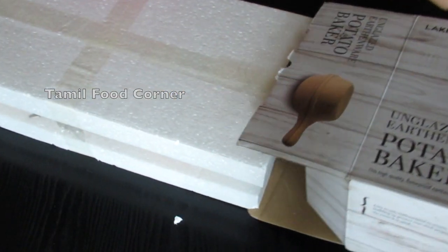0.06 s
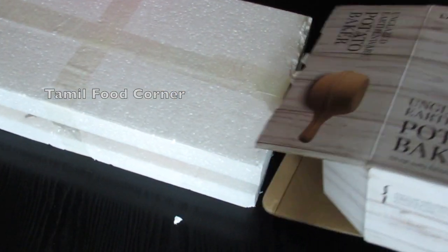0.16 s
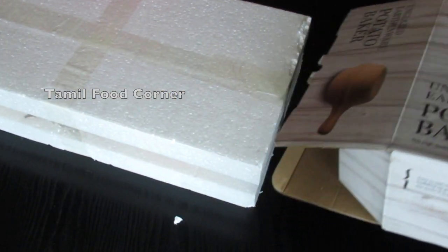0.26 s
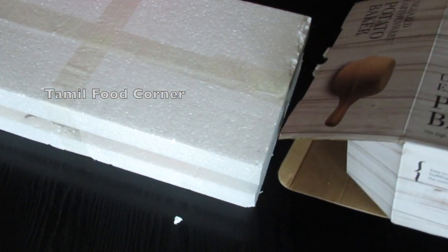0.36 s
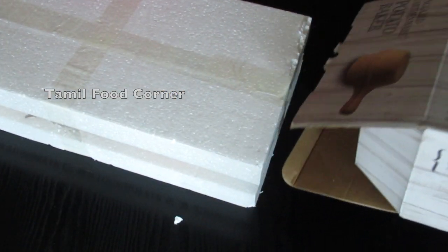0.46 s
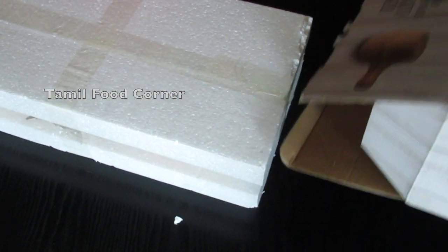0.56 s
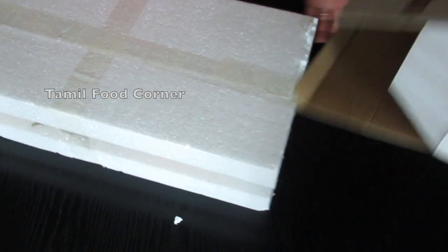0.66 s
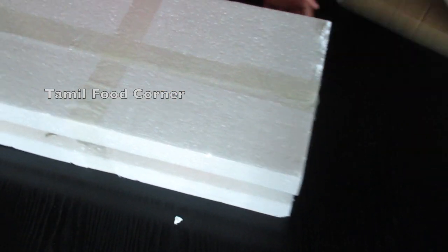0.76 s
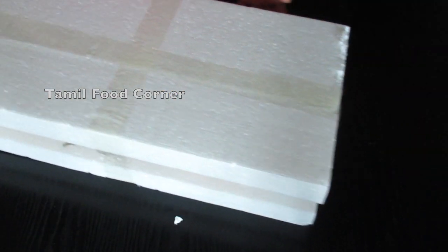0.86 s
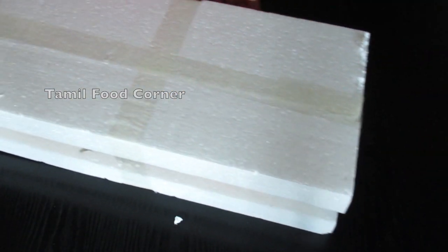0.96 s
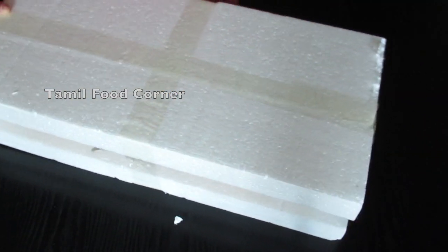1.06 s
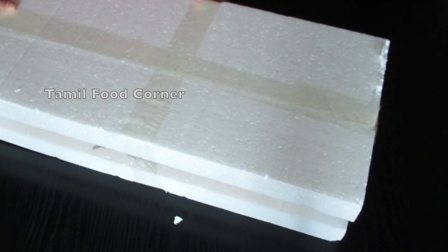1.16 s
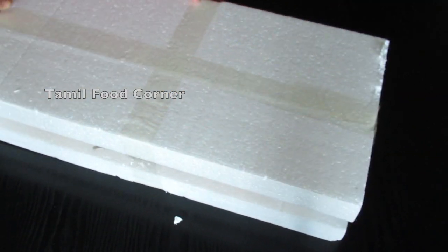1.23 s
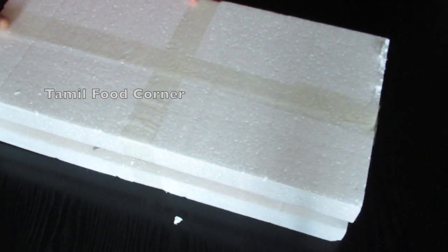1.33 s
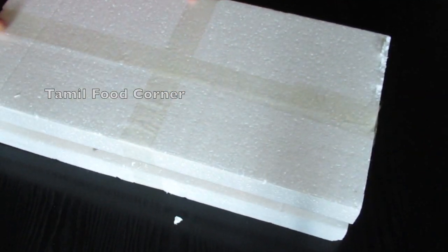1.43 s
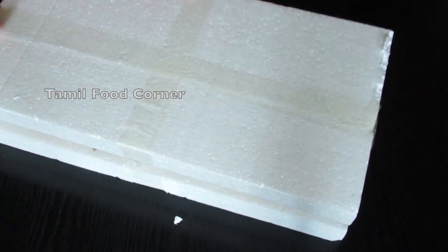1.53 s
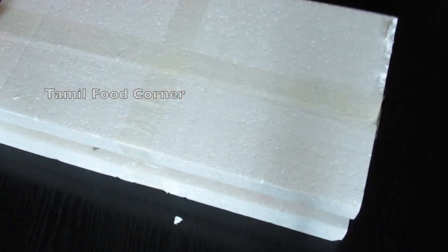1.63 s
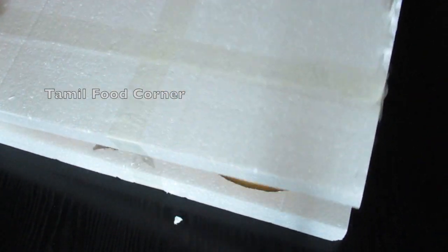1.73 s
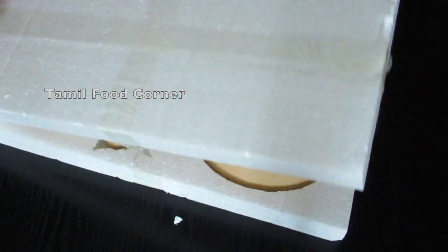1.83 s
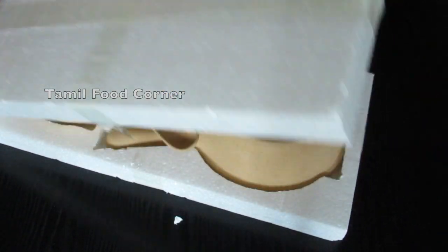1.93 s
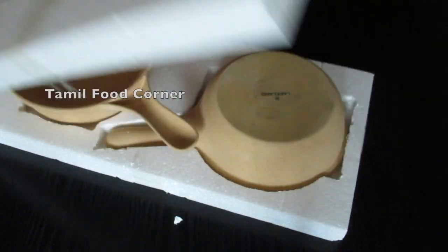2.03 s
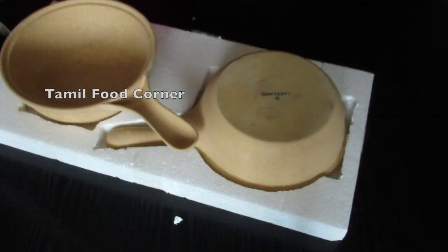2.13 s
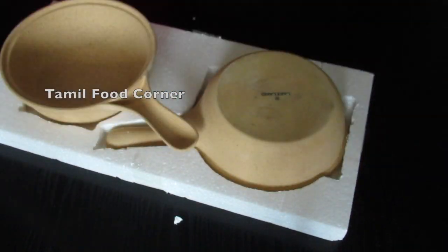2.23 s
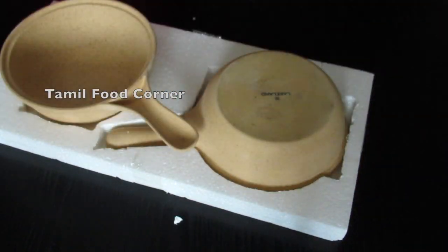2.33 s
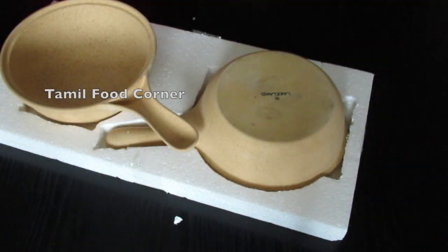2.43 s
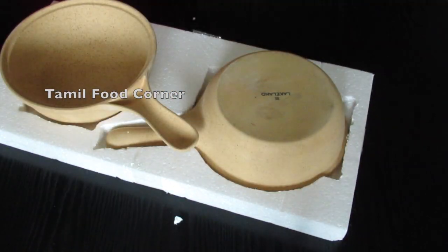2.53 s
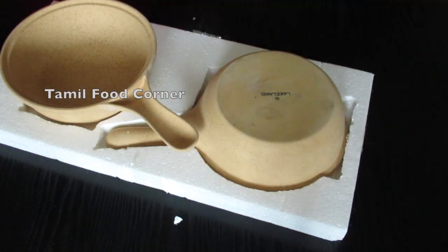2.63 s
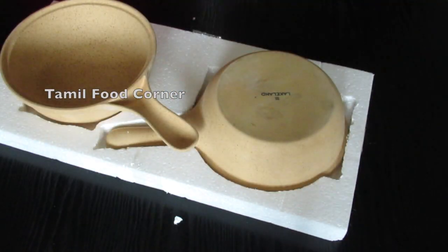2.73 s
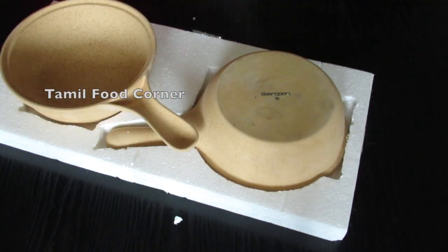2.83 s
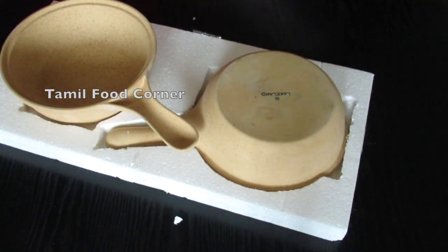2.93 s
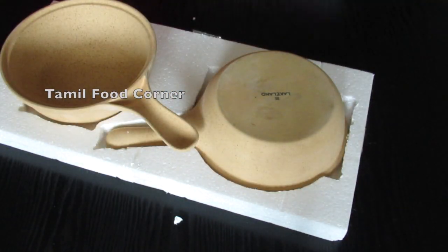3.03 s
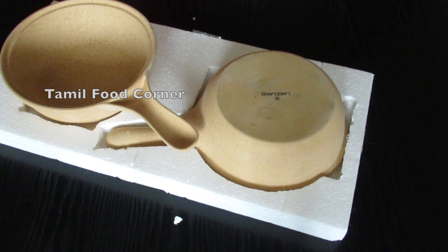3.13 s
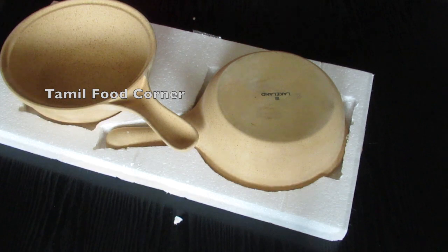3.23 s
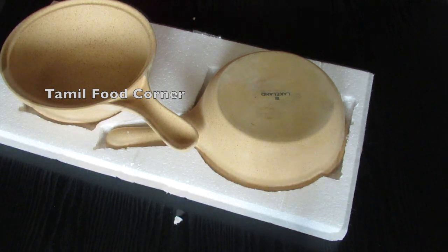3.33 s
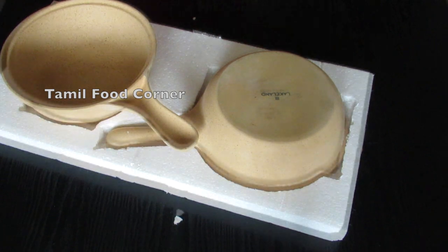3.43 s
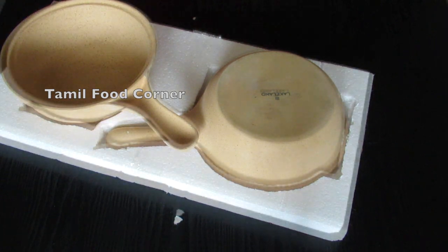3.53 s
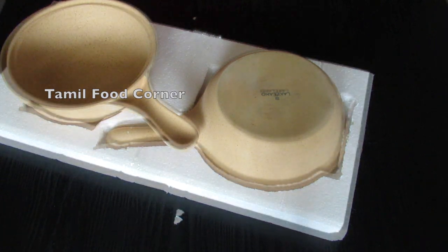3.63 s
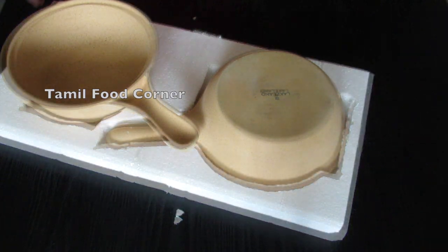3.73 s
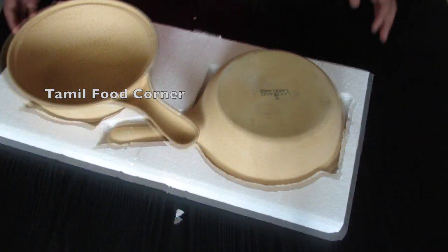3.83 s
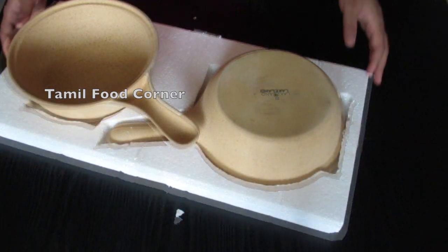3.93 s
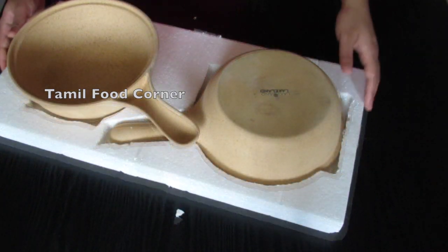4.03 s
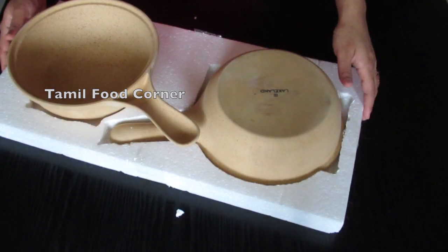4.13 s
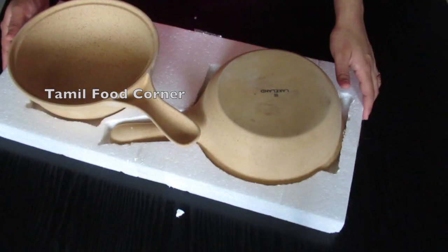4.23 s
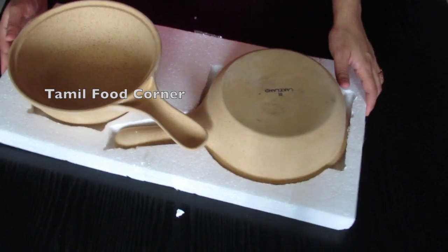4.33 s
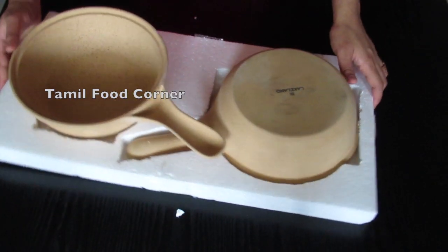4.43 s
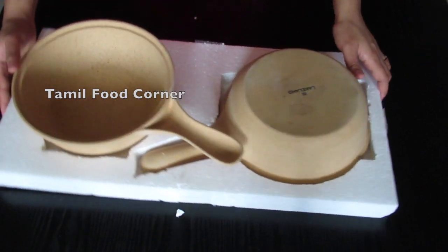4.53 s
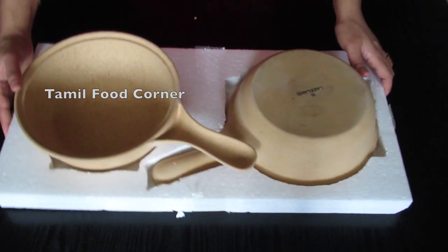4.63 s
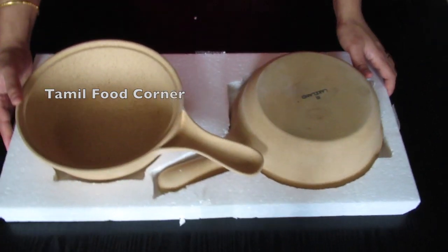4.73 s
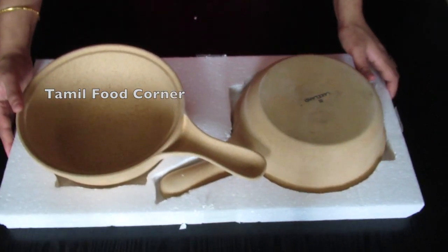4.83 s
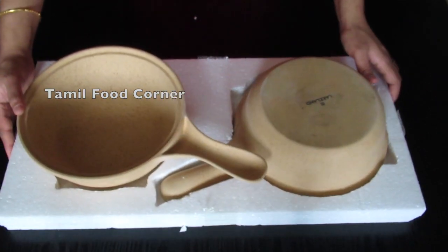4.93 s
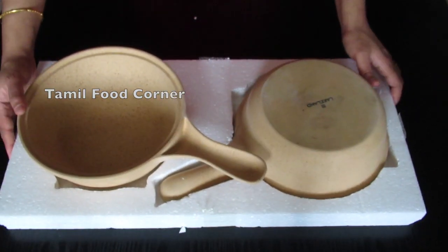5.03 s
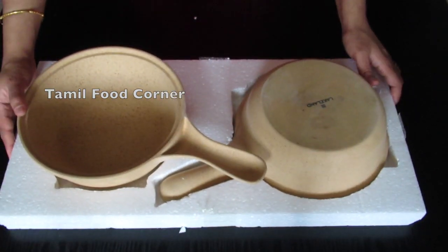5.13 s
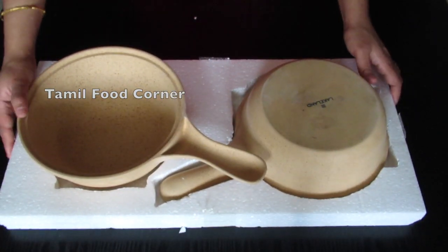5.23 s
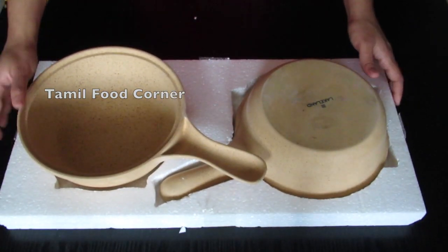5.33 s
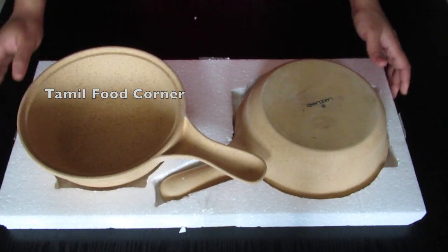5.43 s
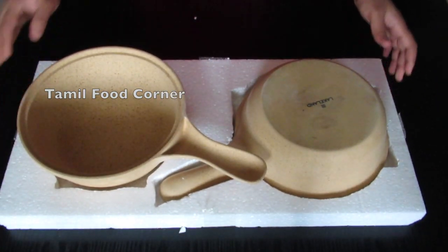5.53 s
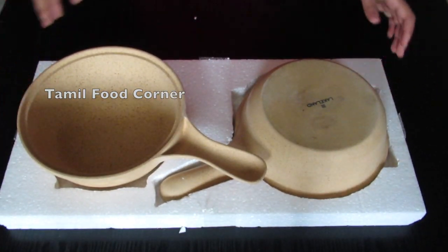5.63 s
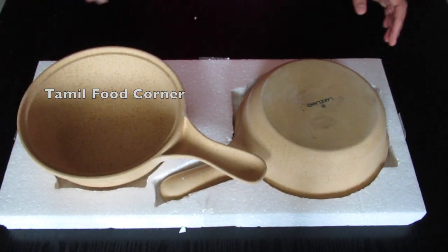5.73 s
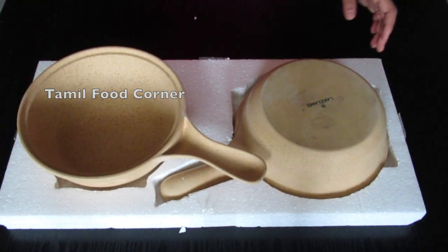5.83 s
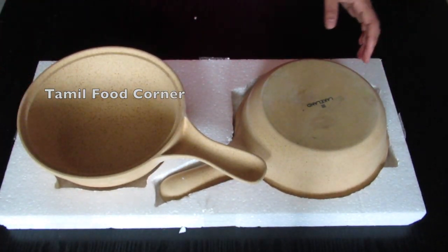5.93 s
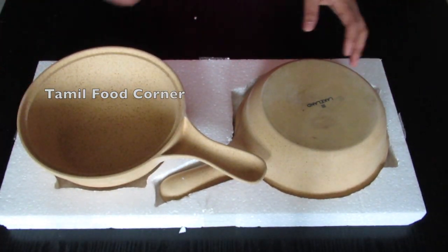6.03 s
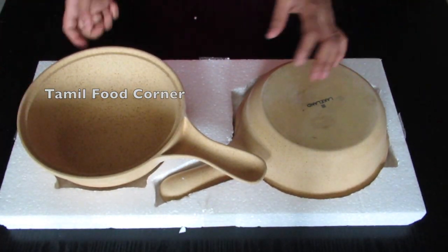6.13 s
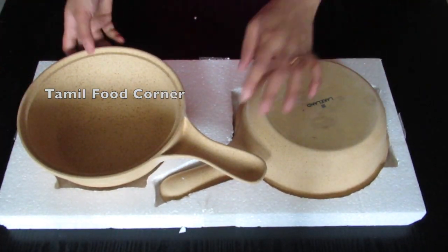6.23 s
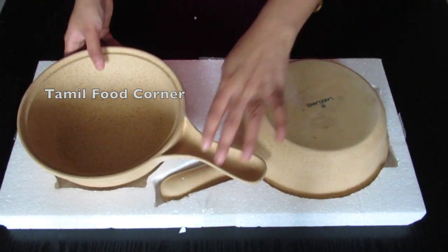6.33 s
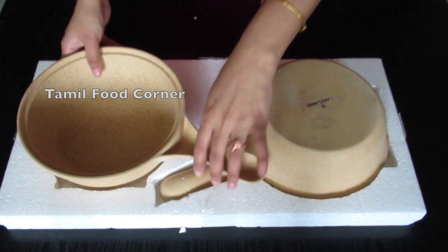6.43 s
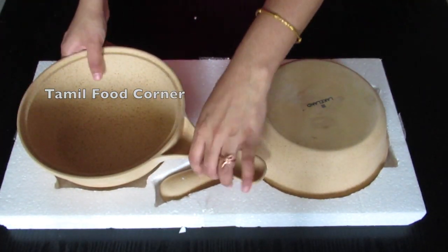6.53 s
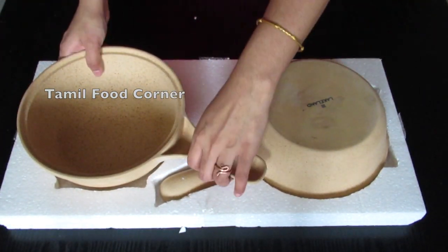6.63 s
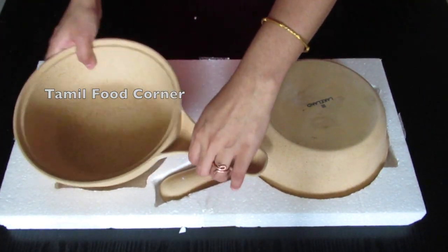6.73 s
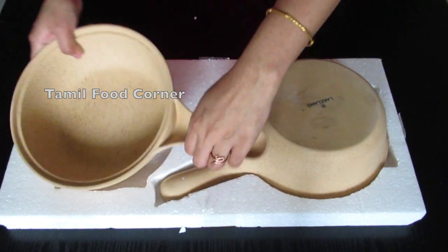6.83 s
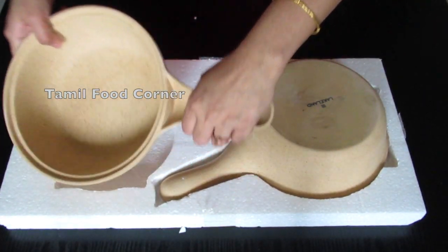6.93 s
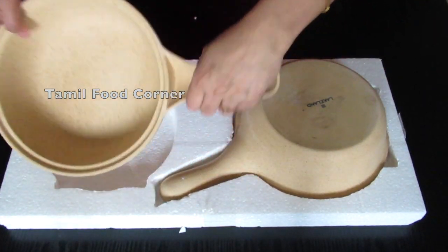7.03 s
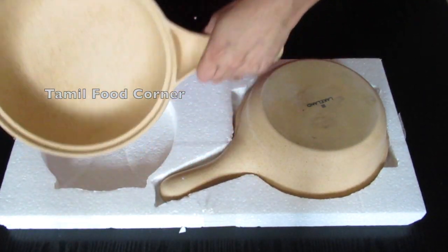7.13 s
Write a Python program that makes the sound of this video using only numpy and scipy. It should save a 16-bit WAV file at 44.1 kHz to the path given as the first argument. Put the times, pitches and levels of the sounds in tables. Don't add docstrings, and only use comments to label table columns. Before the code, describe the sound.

A foam tray scrapes harshly out of a carton, slides over a table, its lid squeaks off, and a clay pan is lifted with faint clinks.

```python
import sys
import numpy as np
from scipy import signal
from scipy.fft import rfft, irfft, next_fast_len
from scipy.io import wavfile
from scipy.ndimage import uniform_filter1d

SR = 44100
rng = np.random.default_rng(int(sys.argv[2]) if len(sys.argv) > 2 else 0)


def inscribe(sig):
    pcm = np.round(np.clip(np.atleast_2d(sig).T, -1, 1) * 32767)
    wavfile.write(sys.argv[1], SR, pcm.astype(np.int16))


def magnitude_from_level(level_db):
    exponent = np.asarray(level_db, float) / 20
    return 10 ** exponent


N = 316197

MEDIUM_DB = -35

# f/Hz, level/dB
CARTON = [(18, -41), (30, -19), (151, -10), (201, -0.5), (514, -6), (779, -2.5), (1150, -8), (1420, -3),
          (9760, 2), (15200, -3)]
# f/Hz, level/dB
SLIDE = [(18, -50), (30, -14), (85, -16), (217, -17.5), (541, -3), (684, -3.5), (779, -3), (1570, -7),
         (1890, -7), (4240, -10), (5950, -5.5), (10800, -7.5), (15200, -13.5)]
# f/Hz, width/Hz, level/dB
SLIDE_RINGS = [(830, 76, 2.5), (1790, 40, 2.3), (2580, 230, 1.1)]
# f/Hz, level/dB
LID = [(18, -56), (30, -30), (140, -11.5), (321, -5), (667, -4.5), (740, -7), (1750, -6.5), (2330, -9.5),
       (2940, -8), (6600, -4.5), (15200, -16.5)]
# f/Hz, width/Hz, level/dB
LID_RINGS = [(656, 83, 1.3), (1990, 30, 6), (3300, 150, 2.5), (4870, 63, 3.5), (5600, 80, 4), (6960, 70, 5)]
# f/Hz, level/dB
HANDLE = [(18, -33), (30, -8), (90, -24), (129, -14), (297, -13.5), (386, -7), (475, 2.5), (570, 0.5),
          (1890, 4), (11700, -2), (15200, -9.5)]
# f/Hz, level/dB
CARD = [(18, -46), (30, -19), (406, -13), (463, -6), (527, -10), (721, -15), (3100, -6), (15200, -36)]
# f/Hz, level/dB
PAN = [(18, -56), (30, -25), (313, -15), (821, -5), (1010, -6.5), (1460, -0.5), (1660, 0), (3020, 1),
       (3720, -2), (7330, 1), (15200, -9.5)]
# f/Hz, width/Hz, level/dB
PAN_RINGS = [(1460, 40, 4), (3100, 120, 1.5), (5020, 68, 4.2), (6100, 220, 3)]


def level(x, db=0):
    return x * magnitude_from_level(db) / np.sqrt(np.mean(x ** 2))


def shape(x, gain):
    size = next_fast_len(len(x))
    f_hz = np.fft.rfftfreq(size, 1 / SR) + 1
    return irfft(rfft(x, size) * gain(f_hz), size)[:len(x)]


def detuning(f, centre_hz):
    return f / centre_hz - centre_hz / f


def highpass(f, corner_hz, power):
    return 1 / (1 + (corner_hz / f) ** power)


def colour(points, rings=()):
    hz, db = np.transpose(points)

    def gain(f):
        broad_db = np.interp(np.log(f), np.log(hz), db)
        rings_db = sum(peak_db / (1 + (2 * (f - c_hz) / width_hz) ** 2) for c_hz, width_hz, peak_db in rings)
        return magnitude_from_level(broad_db + rings_db)
    return gain


def walk(rate_hz):
    hold = int(SR / rate_hz)
    steps = np.repeat(rng.standard_normal(N // hold + 1), hold)
    return 0.48 * uniform_filter1d(uniform_filter1d(steps, hold), hold)[:N]


def decay(t, t60_s):
    return 1000 ** (-t / t60_s)


def ring(hz, t60_s, size):
    t = np.arange(size) / SR
    return np.sin(2 * np.pi * hz * t) * decay(t, max(t60_s, .002))


def add(out, start_s, x):
    i = int(start_s * SR)
    out[i:i + len(x)] += x[:N - i]


def effort(t):
    # t/s, effort/dB, weight/dB (body level when pressed rather than skimmed)
    slide_paths = [
        [(0, -19, 0), (.08, -17.5, -5), (.11, -17, -0.5), (.134, -21.5, -4), (.19, -16.5, -3), (.29, -36, 2),
         (.335, -39.5, 3)],
        [(.598, -38, -2), (.726, -24, 0), (.74, -26, -2.5), (.84, -21, -0.5), (1.05, -23, 1), (1.16, -25.5, 1),
         (1.244, -34.5, 2)],
        [(1.505, -39, 1.5), (1.57, -22.5, 2), (1.613, -18, 1.5), (1.7, -22.5, -1), (1.753, -20, -2.5),
         (1.78, -21.5, 1.5), (1.827, -26, -4), (1.95, -43.5, 2)],
        [(4.277, -56, 13), (4.303, -34, 0.5), (4.39, -26, 2), (4.513, -23, 3), (4.76, -26.5, 2.5),
         (5.081, -29.5, -1.5), (5.18, -44, 0.5), (5.257, -55, -4)],
        [(6.62, -49, 3), (6.654, -38, 2), (6.71, -34, 5.5), (6.774, -19, -3), (6.812, -19, -4.5),
         (6.864, -25, -2), (6.96, -44, -4), (7.08, -53.5, 4)],
    ]
    # peak t/s, effort/dB, rise/s and
    # fall/s per 20 dB, weight/dB
    rustles = [(0.338, -35, .005, 0.16, -1), (.51, -51, 0.055, .2, 8), (.59, -44.5, 0.22, .05, -2),
               (1.25, -34.5, .01, .2, 5), (1.344, -31, 0.32, 0.48, -1), (1.535, -28, .04, .05, 2),
               (1.567, -22, .02, .04, 0), (1.657, -21, .03, .03, 0), (1.985, -31.5, .015, .12, 2),
               (2.02, -29.5, 0.07, 0.13, 1), (2.19, -41.5, 0.076, .08, -0.5), (2.27, -43.5, .02, .2, 2),
               (2.32, -43, .15, .06, 1.5), (2.368, -32.5, 0.03, 0.29, -1), (2.628, -39.5, 0.053, 0.22, 0),
               (2.948, -39, 0.22, .16, 1), (3.1, -50, 0.039, 0.25, -5), (3.125, -39, .01, 0.12, 1.5),
               (3.18, -56, .1, 0.074, 1), (3.311, -35.5, 0.05, 0.22, 1), (3.46, -41, 0.12, 0.105, 1.5),
               (3.62, -43, .07, 0.25, -0.5), (3.71, -45, .3, .03, -4), (3.856, -47, .06, 0.29, 2.5),
               (4.003, -53, .3, .3, -5), (4.08, -32, 0.022, 0.37, -10), (4.126, -26, 0.095, 0.19, 0),
               (5.3, -37.5, 0.06, .25, -1.5), (5.39, -41.5, 0.17, 0.13, 1.5), (5.48, -58, .3, 0.06, -1),
               (5.746, -56, .04, .08, 1), (5.968, -65, .6, .8, 1), (6.1, -59, .03, .1, 5),
               (6.39, -56, 0.23, .2, 2), (6.465, -51, .015, .1, -4), (6.525, -42, .07, .25, 1),
               (6.57, -44, .1, .08, 3), (7.13, -50, .2, .15, -2)]
    rest_db = -75
    power, weight = magnitude_from_level(rest_db) ** 2, 0
    for s, db, lean_db in map(np.transpose, slide_paths):
        push = magnitude_from_level(np.interp(t, s, db, rest_db, rest_db)) ** 2
        power = power + push
        weight = weight + push * np.interp(t, s, lean_db, 0, 0)
    for s, db, rise_s, fall_s, lean_db in rustles:
        distance = np.maximum((s - t) / max(rise_s, .002), (t - s) / max(fall_s, .002))
        push = magnitude_from_level(db - 20 * distance) ** 2
        power = power + push
        weight = weight + push * lean_db
    return 10 * np.log10(power) - MEDIUM_DB, weight / power


def slips(spread_db, judder_db):
    judder = walk(150) + .5 * walk(45)
    larger = np.minimum(rng.exponential(size=N), 3)
    return rng.standard_normal(N) * magnitude_from_level(spread_db * larger + judder_db * judder)


def panels(x):
    regrip_s, t60_s, ring_db = .12, 0.086, -8.5
    t = np.arange(4096) / SR
    turn = np.pi * np.arange(len(x)) / SR / regrip_s / 3
    thickets = rng.standard_normal((3, len(t))) * decay(t, t60_s)
    thickets = thickets / np.linalg.norm(thickets[0])
    grips = np.cos(turn - np.pi / 3 * np.arange(3)[:, None]) ** 2
    rung = signal.oaconvolve(x * grips, thickets, axes=1).sum(axis=0)
    return x + magnitude_from_level(ring_db) * rung[:len(x)]


def rubbing():
    # from t/s, colour, resonances
    contacts = [(0, CARTON, []), (.55, SLIDE, SLIDE_RINGS), (1.5, LID, LID_RINGS), (1.96, LID, []),
                (2.13, HANDLE, []), (3.1, CARD, []), (3.27, HANDLE, []), (4.03, SLIDE, SLIDE_RINGS),
                (5.25, HANDLE, []), (6.45, PAN, PAN_RINGS), (6.961, HANDLE, [])]
    # thin walls/dB, slab/dB, table/dB
    balances = [(-6.5, -4.5, -10), (-3, -3, -25), (0, -1.6, -18), (1.5, -4.5, -13), (-2.5, -6.5, -20),
                (0.5, -7, -22), (-4, -7, -19.5), (-5, -8.5, -20.5), (-2.5, -8.5, -19.5), (-4, -8.5, -23.5),
                (-4.5, -9, -21)]
    band_edges_hz = (4000, 1300, 350)
    follows = (1, 0.9, 0.77, 0.31)
    bears = (0.028, 0.68, 1.38, 0.4)
    fizz_hz, fizz_follow = 9000, 0.093
    t = np.arange(N) / SR
    push_db, weight_db = effort(t)
    force = slips(spread_db=2.5, judder_db=1.0)
    above = [lambda f, edge_hz=edge_hz: highpass(f, edge_hz, 8) for edge_hz in band_edges_hz]
    shares = [above[0],
              lambda f: above[1](f) - above[0](f),
              lambda f: above[2](f) - above[1](f),
              lambda f: 1 - above[2](f)]
    starts_s = [contact[0] for contact in contacts] + [N / SR + 1]
    out = np.zeros(N)
    for (_, points, rings), balance, a, b in zip(contacts, balances, starts_s, starts_s[1:]):
        i, j = max(int((a - .03) * SR), 0), min(int((b + 0.027) * SR), N)
        fade_in = t[i:j] - a + .03 + (a == 0)
        fade_out = b + .03 - t[i:j]
        fade = np.sqrt(np.clip(np.minimum(fade_in, fade_out) / .06, 0, 1))
        tone, rung = colour(points, rings), panels(force[i:j])
        for share, follow, bear, db in zip(shares, follows, bears, (0, *balance)):
            part = shape(rung, lambda f: tone(f) * share(f))
            part_db = MEDIUM_DB + db + follow * push_db[i:j] + bear * weight_db[i:j]
            out[i:j] += fade * level(part) * magnitude_from_level(part_db)
    fizz = shape(out, lambda f: highpass(f, fizz_hz, 4))
    return out + fizz * (magnitude_from_level(fizz_follow * (push_db - 3)) - 1)


def air():
    # f/Hz, level/dB per Hz
    air_colour = [(12, -33), (20, 3), (64, -3.5), (125, -7), (250, -2), (529, -9), (947, -7), (4480, -20.5),
                  (8250, -21), (13200, -29), (15200, -35)]
    air_db = -50
    return level(shape(rng.standard_normal(N), colour(air_colour)), air_db) * magnitude_from_level(0.5 * walk(2.84))


def snaps():
    # t/s, peak level/dB, centre f/Hz
    beads = [(.198, -4, 11000), (.336, -13, 4500), (.337, -15, 11000), (.425, -30, 9000), (.567, -29, 7500),
             (2.361, -24, 6000), (2.951, -27, 6000), (2.953, -30, 11000), (1.284, -26, 3000),
             (1.533, -18, 6650), (1.731, -12, 5500), (1.979, -20, 3800), (1.987, -20, 3800),
             (2.048, -19, 3000), (2.35, -30, 3240), (2.465, -18, 12500), (2.555, -30, 10000),
             (2.614, -30, 6000), (2.668, -24, 12500), (2.691, -23, 12500), (3.099, -36, 6900),
             (3.283, -33, 6900), (4.017, -27, 5000), (4.294, -20, 12500), (4.304, -12, 11000),
             (5.143, -28, 5150), (5.272, -29, 7000), (5.277, -31, 5400), (5.302, -24, 7000),
             (6.516, -33, 5000), (6.639, -30, 4000)]
    t60_s, width, lead = .011, 1.1, 16
    out, t = np.zeros(N), np.arange(1024) / SR
    for s, db, hz in beads:
        burst = rng.standard_normal(len(t)) * decay(t, t60_s)
        burst[0] = -3
        click = shape(np.roll(burst, lead), lambda f: 1 / (1 + (detuning(f, hz) / width) ** 2))
        add(out, s - lead / SR, magnitude_from_level(db) * click / np.abs(click).max())
    return out


def bumps():
    # t/s, peak level/dB, ring f/Hz, t60/s
    knocks = [(0.2, -19, 330, 0.05), (0.502, -26.5, 300, 0.058), (0.59, -31, 200, 0.095),
              (1.069, -39, 230, 0.082), (1.185, -36, 211, 0.08), (1.246, -22.5, 500, 0.051),
              (1.6, -27, 138, 0.07), (1.573, -18.5, 186, 0.04), (1.609, -16, 675, 0.088),
              (3.202, -36, 420, 0.06), (3.275, -35, 278, 0.11), (3.275, -41, 75, .12), (.205, -36, 75, .1),
              (1.56, -35, 62, .12), (2.15, -47, 100, .1), (3.308, -30, 136, 0.073),
              (3.646, -29, 304, 0.091), (3.744, -39, 324, 0.08), (3.904, -40, 182, 0.12),
              (5.342, -24, 480, 0.016)]
    thud_db, thud_width, onset_s, size = -3, 1.5, 0.002, 9000
    out, t = np.zeros(N), np.arange(size) / SR
    for s, db, hz, t60_s in knocks:
        body = ring(hz, t60_s, size)
        body = body + 0.45 * ring(2.4 * hz, 1.3 * t60_s, size)
        body = body + 0.25 * ring(0.427 * hz, 1.64 * t60_s, size)
        thud = shape(rng.standard_normal(size), lambda f: 1 / (1 + (detuning(f, hz) / thud_width) ** 2))
        body = body + level(thud, thud_db) * decay(t, 1.6 * t60_s)
        add(out, s, magnitude_from_level(db - 2) * body * (1 - np.exp(-t / onset_s)))
    return out


def ticks():
    # t/s, peak level/dB, ring f/Hz, treble level/dB against the peak
    catches = [(0.294, -22.5, 730, -21), (0.337, -14.5, 1150, -9), (0.425, -30, 810, -24),
               (0.6, -25, 5800, -40), (1.248, -15, 920, -27), (1.361, -17.5, 5320, -17),
               (1.505, -36, 800, -17), (1.985, -25, 3980, -31), (2.466, -37, 810, -5),
               (2.69, -32, 1580, -15), (2.918, -30.5, 3300, -12), (2.95, -18, 1880, -29),
               (3.124, -36, 2350, -34), (4.016, -28, 2000, -34), (4.05, -31, 2110, -24),
               (4.072, -29, 9000, -13), (4.279, -24, 1500, -28), (4.294, -28, 1040, -20),
               (4.302, -29, 993, -20), (5.271, -26.5, 1300, -26), (5.302, -24, 1500, -14),
               (5.775, -35, 1700, -36)]
    snap_t60_s, tail_t60_s, wall_t60_s = .016, 0.12, .018
    tail_at_1k, tail_slope = 0.32, 0.7
    body_top, lead = 3.2, 128
    out, t = np.zeros(N), np.arange(9000) / SR
    for s, db, hz, treble_db in catches:
        tail = tail_at_1k * (1000 / hz) ** tail_slope
        spray = rng.standard_normal(len(t)) * (decay(t, snap_t60_s) + tail * decay(t, tail_t60_s))
        spray[8] = -3
        spray = np.roll(spray, lead)

        def through_wall(f):
            resonance = 1 / np.sqrt(1 + (detuning(f, hz) / 1.7) ** 2)
            return resonance / (1 + (f / hz / body_top) ** 4) / (1 + (hz / f / 4.5) ** 4)
        body = shape(spray, through_wall)
        sharp = shape(spray, lambda f: highpass(f, 5500, 4))
        crack = body / np.abs(body).max()
        crack = crack + .2 * np.roll(ring(hz, wall_t60_s, len(t)), lead)
        crack = crack + magnitude_from_level(treble_db + 5) * sharp / np.abs(sharp).max()
        add(out, s - lead / SR, magnitude_from_level(db + 4) * crack)
    return out


def squeals():
    # t/s, length/s, f/Hz, level/dB
    scuff_notes = [(.565, .007, 8000, -41), (1.245, 0.022, 1900, -27.5), (2.358, 0.034, 2370, -39),
                   (2.388, 0.068, 830, -41), (2.95, 0.02, 1750, -34.5), (2.958, 0.03, 1150, -38),
                   (2.99, .05, 1150, -45), (3.418, 0.069, 734, -46), (4.047, 0.035, 2140, -38),
                   (5.341, .014, 910, -36), (1.76, .07, 2800, -27), (1.57, .1, 2500, -26),
                   (3.72, .15, 2300, -53), (3.125, .04, 3300, -40), (5.773, .007, 2500, -45),
                   (6.75, 0.04, 5300, -27), (6.765, .04, 6900, -27), (6.79, .045, 6950, -28),
                   (6.81, .04, 9000, -28), (6.83, .04, 7700, -29), (6.84, .04, 10500, -31),
                   (1.248, 0.04, 500, -28), (4.07, .04, 8500, -36), (4.115, .03, 6000, -30),
                   (1.59, .06, 6600, -27), (1.775, .03, 5600, -26), (3.72, 0.093, 660, -50.5)]
    # t/s, length/s, f/Hz, level/dB
    wall_notes = [(.334, .012, 3750, -34), (.62, 0.033, 775, -31), (1.558, 0.025, 2400, -22),
                  (1.58, .11, 2040, -27), (1.6, 0.11, 3300, -33), (1.616, 0.045, 2630, -24),
                  (1.68, 0.05, 2370, -25), (1.725, 0.018, 2400, -15.5), (1.74, .024, 2390, -16),
                  (1.77, 0.025, 5200, -24), (1.771, 0.02, 2800, -22.5), (3.14, 0.06, 3180, -46),
                  (4.013, .016, 4400, -35), (4.014, .015, 2770, -43), (4.5, 0.12, 1780, -33.5),
                  (5.36, .04, 3520, -53), (6.08, 0.2, 2480, -60), (6.2, .22, 2380, -61)]
    # t/s, length/s, f/Hz, level/dB
    slab_notes = [
        (.67, .16, 806, -30),
        (.79, .17, 782, -28.5),
        (3.195, .07, 490, -49),
        (4.115, .08, 771, -39),
        (4.42, .4, 788, -35),
        (6.376, .3, 772, -53.5),
        (6.68, 0.23, 776, -47),
    ]
    # t/s, length/s, f/Hz, level/dB
    clay_notes = [(6.488, 0.05, 6330, -50), (6.49, .07, 2595, -47), (6.79, .09, 3200, -43),
                  (6.9, .08, 1470, -48), (7.005, .07, 1780, -52), (7.005, .058, 3140, -49),
                  (7.085, 0.03, 3120, -54), (7.115, 0.027, 3150, -48), (7.095, 0.045, 2310, -52),
                  (7.12, .045, 11450, -60), (7.107, .04, 6970, -54), (7.12, .025, 7500, -56),
                  (7.105, 0.025, 8900, -62), (7.138, .036, 9050, -52), (7.155, .015, 3100, -59),
                  (7.08, .06, 1790, -58)]
    steady = .45
    out = np.zeros(N)
    for notes, sharpness in ((scuff_notes, 3.5), (wall_notes, 12), (slab_notes, 8.6), (clay_notes, 60)):
        for s, length_s, hz, db in notes:
            size = int(length_s * SR)
            note = shape(rng.standard_normal(SR // 2), lambda f: 1 / (1 + 2j * (f / hz - 1) * sharpness) ** 2)
            envelope = np.abs(signal.hilbert(note)) + 1e-9
            note = (note / envelope ** steady)[:size]
            add(out, s, level(note, db) * signal.windows.tukey(size, .6))
    return out


def room(x):
    t60_s, echo_db, dull_hz, gap_s = 0.37, -7, 5000, .004
    t = np.arange(SR // 2) / SR
    echoes = rng.standard_normal(len(t)) * decay(t, t60_s) * (t > gap_s)
    echoes = shape(echoes, lambda f: 1 / np.sqrt(1 + (f / dull_hz) ** 2))
    return x + magnitude_from_level(echo_db) * signal.fftconvolve(x, echoes / np.linalg.norm(echoes))[:N]


def scene():
    mono = rubbing() + air() + room(snaps() + bumps() + ticks() + squeals())
    return np.array([mono, mono])


def low_pass(x):
    return signal.sosfilt(signal.butter(12, 15200, fs=SR, output="sos"), x)


def record(dry):
    rounded = np.tanh(0.59 * dry) / 0.61
    top_cut = signal.ellip(10, .2, 80, 14950, fs=SR, output="sos")
    return low_pass(signal.sosfilt(top_cut, rounded))


dry = scene()
out = record(dry)
inscribe(out)
```